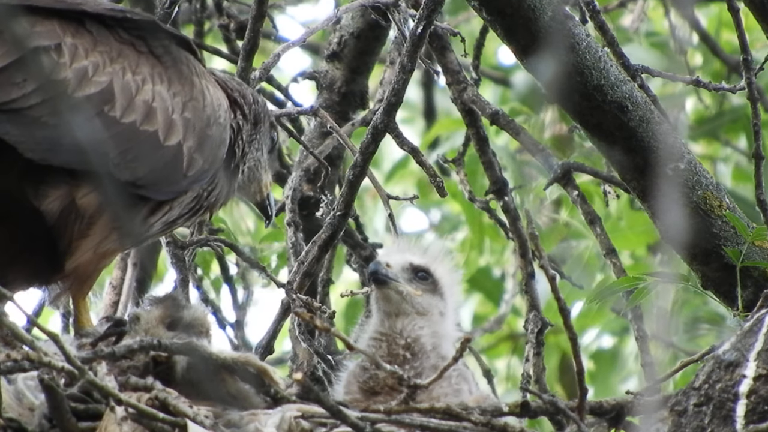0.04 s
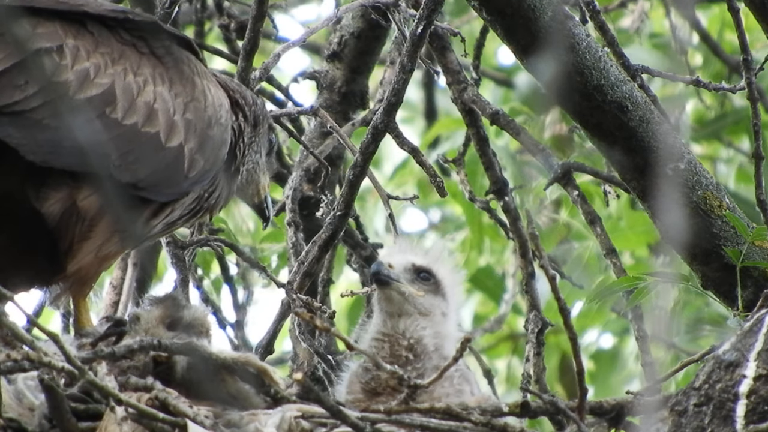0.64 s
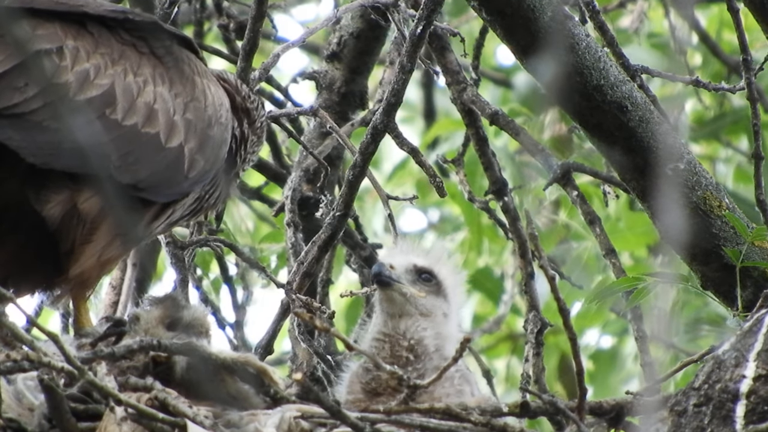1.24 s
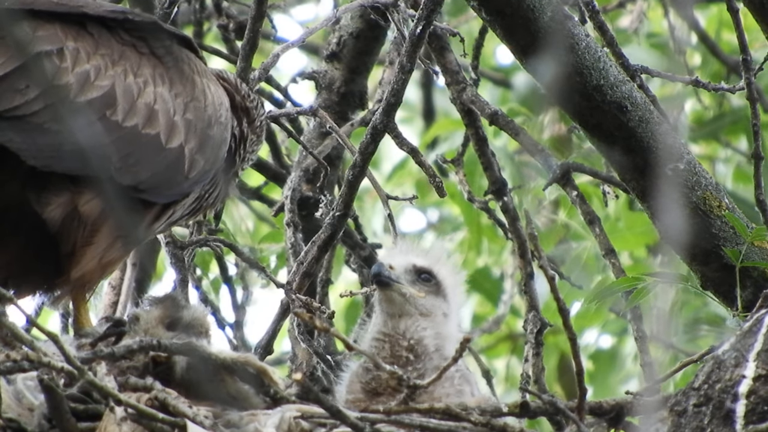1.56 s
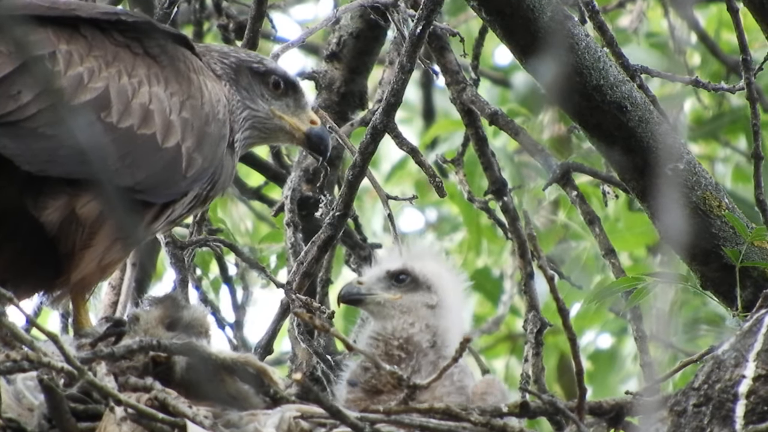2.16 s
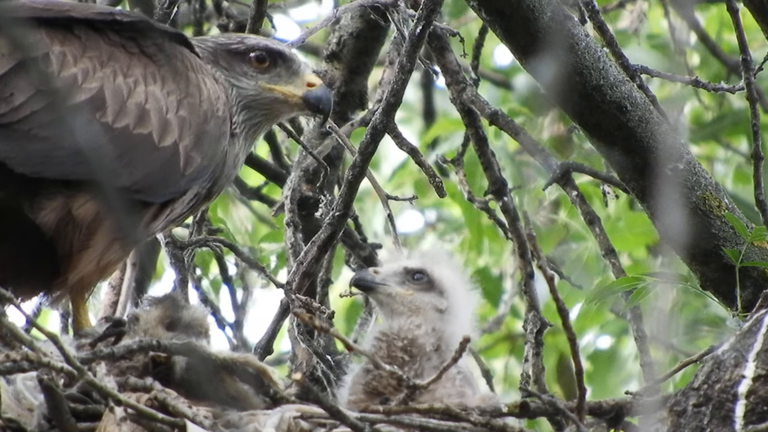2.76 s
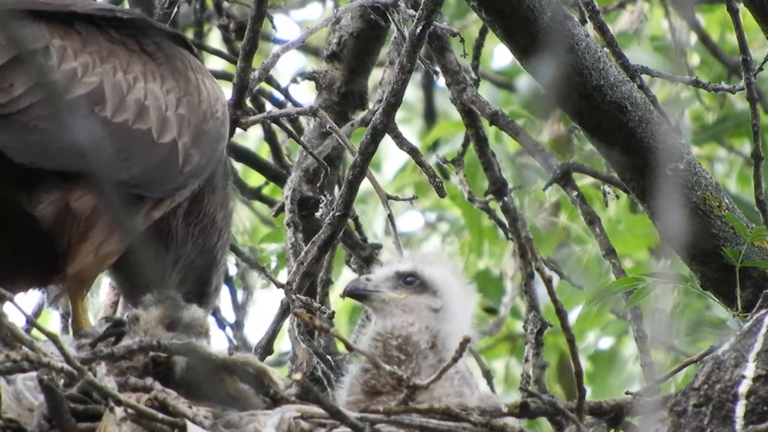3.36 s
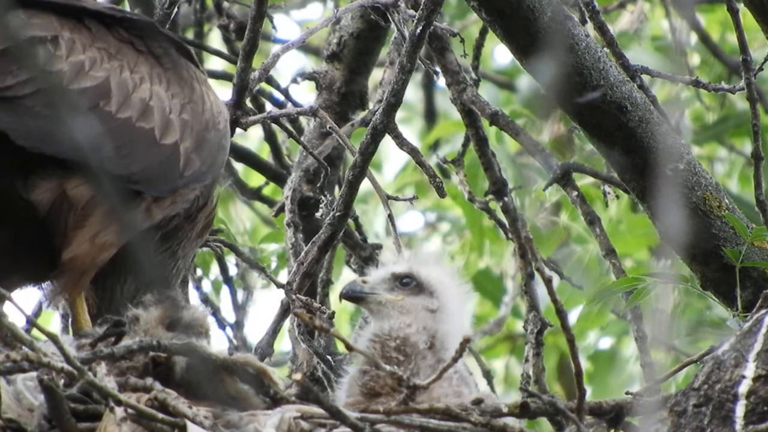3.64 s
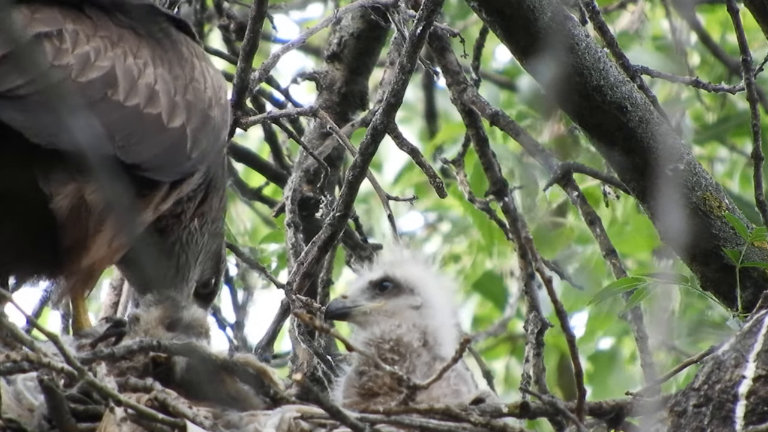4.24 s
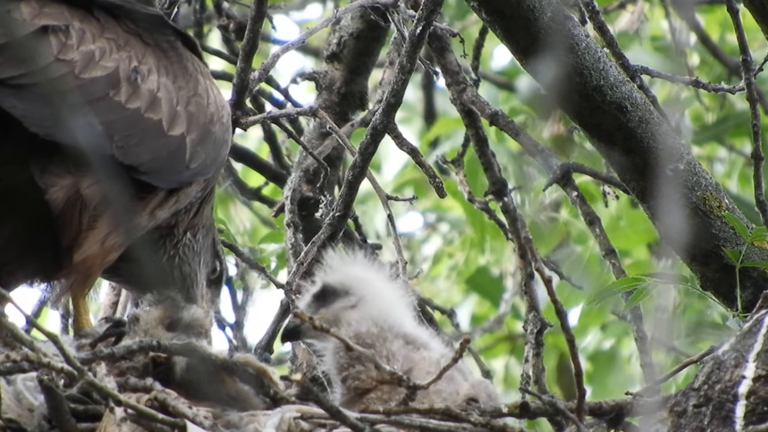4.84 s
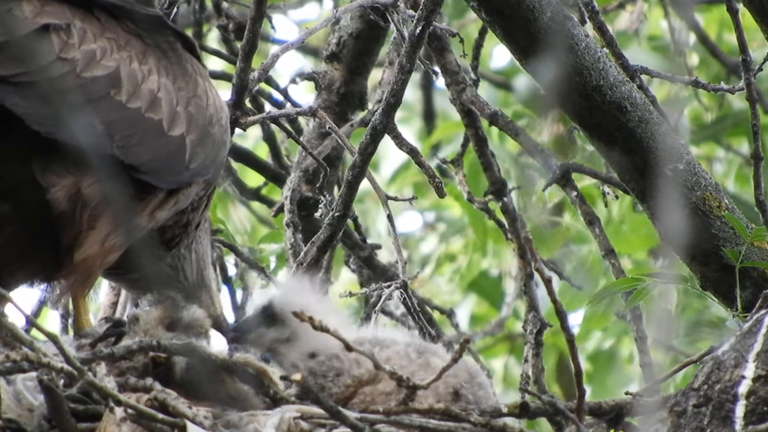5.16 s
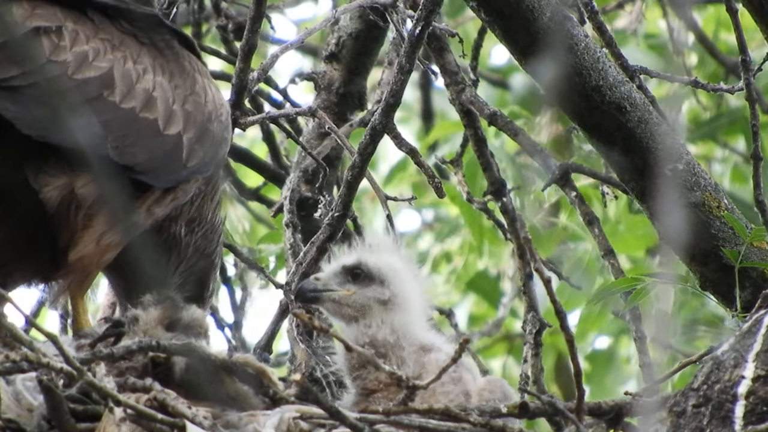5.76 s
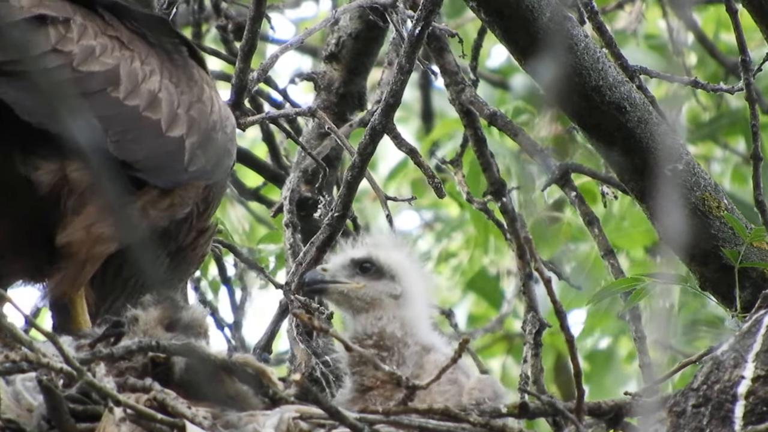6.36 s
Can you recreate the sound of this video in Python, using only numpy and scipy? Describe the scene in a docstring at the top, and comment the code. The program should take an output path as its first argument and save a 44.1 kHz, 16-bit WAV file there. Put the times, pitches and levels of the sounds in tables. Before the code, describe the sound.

A nearby songbird trades sweeping twitters with harsh chirps and short buzzes, over distant birdsong and a faint low outdoor hum.

```python
"""Small birds sing in a leafy tree, over soft outdoor air, a low hum and distant birds. The near bird opens
with a buzz under a thin high call from further off, then trades sweeping twitters with harsh two-voiced chirps
and more buzzes. Around two seconds another bird holds a thin whistle; then one further off repeats a low
scooping note six times. Two last twitters close the scene. Each note is a near-pure tone from a bird's syrinx,
scattered by branches and leaves."""
import sys
import numpy as np
from scipy import signal
from scipy.fft import rfft, irfft
from scipy.io import wavfile
from scipy.ndimage import uniform_filter1d

SR = 44100
rng = np.random.default_rng(int(sys.argv[2]) if len(sys.argv) > 2 else 0)


def generate_wav(sig):
    """Save sig (samples, or channels by samples) to the path in sys.argv[1] as 16-bit PCM at SR."""
    pcm = np.round(np.clip(np.atleast_2d(sig).T, -1, 1) * 32767).astype(np.int16)
    wavfile.write(sys.argv[1], SR, pcm)


N = 282240
TIME = np.arange(N) / SR
FREQS = np.arange(N // 2 + 1) * SR / N
SIDES = np.array([[1], [-1]])  # adds to the left, subtracts from the right


def undb(db):
    """Decibels to gain."""
    return 10 ** (np.asarray(db) / 20)


def unit(x):
    """Scale to rms 1."""
    return x / np.sqrt(np.mean(x ** 2))


def walk(rate_hz, count):
    """Smooth random wander with a spread of 1."""
    step = np.arange(count) * rate_hz / SR
    return 1.226 * np.interp(step, np.arange(4096), rng.standard_normal(4096))


def add(track, start, sound):
    """Mix a sound into the track at a time in seconds."""
    i = int(start * SR)
    sound = sound[max(-i, 0):max(N - i, 0)]
    i = max(i, 0)
    track[i:i + len(sound)] += sound


def noise(points):
    """Noise coloured by an EQ curve of (Hz, dB) points."""
    hz, db = np.transpose(points)
    gain = undb(np.interp(np.log(FREQS + 1), np.log(hz), db))
    return unit(irfft(rfft(rng.standard_normal(N)) * gain, N))


def patchy(x, spread_db, size=2048):
    """Let each narrow band flicker on its own."""
    cells = signal.stft(x, nperseg=size)[2]
    flicker = uniform_filter1d(rng.standard_normal(cells.shape), size=3, axis=-1)
    flicker = unit(uniform_filter1d(flicker, size=2, axis=-2))
    return unit(signal.istft(cells * undb(spread_db * flicker), nperseg=size)[1][..., :N])


def syrinx(hz, db, rough, flutter_db, overtone_db, edge_s=0.00047):
    """A near-pure tone with a weak octave; the membrane trembles in pitch and strength."""
    n = len(hz)
    phase = 2 * np.pi * np.cumsum(hz * (1 + rough * walk(1100, n))) / SR
    i = np.arange(n)
    edges = np.sin(np.pi / 2 * np.clip(np.minimum(i, n - i) / (edge_s * SR), 0, 1)) ** 2
    tone = np.sin(phase) + undb(overtone_db) * np.sin(2 * phase)
    return np.sqrt(2) * tone * edges * undb(db + flutter_db * walk(500, n))


def sweep(points, rough, flutter_db, overtone_db, warble=0):
    """A syllable gliding through (s, Hz, dB) points with rounded turns; returns start and sound."""
    s, hz, db = np.transpose(points)
    s = np.sort(s)
    t = np.arange(s[0] - .002, s[-1] + .002, 1 / SR)
    pitch, loudness = (uniform_filter1d(np.interp(t, s, curve), size=160) for curve in (hz, db))
    pitch = pitch * (1 + warble * walk(261, len(t)))
    return t[0], syrinx(pitch, loudness, rough, flutter_db, overtone_db)


def repeat(shape, cues, **voice):
    """One syllable sung on every cue, each time at its own level and pitch."""
    out = np.zeros(N)
    for at, db, pitch in cues:
        start, sound = sweep(np.array(shape) * [1, pitch, 1], **voice)
        add(out, at + start, undb(db) * sound)
    return out


def phrase(contours, **voice):
    """Notes sung once, each with its own contour."""
    out = np.zeros(N)
    for points in contours:
        add(out, *sweep(points, **voice))
    return out


def beak(x, top_hz=9600):
    """Throat and beak damp the highest overtones."""
    return signal.sosfilt(signal.butter(6, top_hz, fs=SR, output="sos"), x)


def canopy(x, direct_db, branch_db, leaf_db, t60, branch_s=0.019, width=0.55):
    """Branches return a few sharp early echoes; leaves and trunks add a diffuse tail."""
    t = TIME[:SR]
    grain = rng.standard_normal((4, SR))
    sparse = rng.random(SR) < 500 / SR
    early = (grain[0] + width * SIDES * grain[1]) * sparse * np.exp(-t / branch_s) * (t > .002)
    tail = (grain[2] + width * SIDES * grain[3]) * undb(-60 * t / t60) * (1 - np.exp(-t / 0.0075))
    response = (undb(branch_db) * unit(early) + undb(leaf_db) * unit(tail)) / np.sqrt(SR)
    response[:, 0] += undb(direct_db)
    return signal.fftconvolve(x[None], response, axes=1)[:, :N]


# Slapback off the nearest trunks. Each row: delay in seconds, level in dB.
TRUNK_ECHOES = [(.0075, -16), (0.0147, -16.5), (0.026, -22.5), (0.042, -13.5)]
def trunks(x):
    """Each near trunk throws back one clear copy, so that sweeps overlap themselves."""
    out = x.copy()
    for delay, db in TRUNK_ECHOES:
        add(out, delay, undb(db) * x)
    return out


# The bed: two EQ curves and the hum's tones. Each row: frequency in Hz, relative level in dB.
AIR_EQ = [(150, 6), (250, -1), (400, -1.5), (1100, -6.5), (2200, -11), (2700, -9), (3300, -4.5),
          (5200, -13), (7300, -7.5), (9000, -17), (12000, -30.5)]
RUMBLE_EQ = [(15, -17), (30, -15), (38, -3.5), (50, 1.5), (86, -1), (115, -5), (190, -5), (250, -19.5),
             (390, -33), (660, -110)]
HUM_TONES = [(92.5, -47), (140.3, -46.5), (187.6, -54)]
def outdoor_bed(air_db=-51, air_width=0.62, rumble_db=-43, rumble_width=0.12, hum_db=-2, left_db=-0.4):
    """Soft air, wide and gently swelling, over a centred rumble and a wavering hum."""
    air = patchy(noise(AIR_EQ), spread_db=4) + air_width * SIDES * noise(AIR_EQ)
    air = air * undb(air_db + 1.4 * walk(4.255, N))
    rumble = (noise(RUMBLE_EQ) + rumble_width * SIDES * noise(RUMBLE_EQ)) * undb(rumble_db)
    hum = 0
    for hz, db in HUM_TONES:
        phase = 2 * np.pi * np.cumsum(hz + 1.472 * walk(8, N)) / SR
        hum = hum + np.sin(phase) * undb(db + hum_db + 3.4 * walk(8.9, N))
    return (air + rumble + hum) * undb(left_db * SIDES)


# Colour of the far rush. Each row: frequency in Hz, relative level in dB.
RUSH_EQ = [(350, -45), (700, 2), (950, 4.5), (1300, 2), (1900, -40)]
# Its swells. Each row: crest time in seconds, level in dB.
RUSH_SWELLS = [(0, -63), (3.35, -55), (5.8, -59)]
def far_rush(width=0.15, fade_db_per_s=10.5):
    """A soft, patchy midrange rush from far off."""
    swell = sum(undb(db - fade_db_per_s * np.abs(TIME - at)) for at, db in RUSH_SWELLS)
    mid, side = (patchy(noise(RUSH_EQ), spread_db=6) for _ in range(2))
    return (mid + width * SIDES * side) * swell


def distant_birds(level_db=-55.5, count=90):
    """Many birds far off, twittering the near bird's syllables at other pitches."""
    out = np.zeros(N)
    shapes = CHIP, PEAL, ARCH, RISE, FALL
    for when, which, pitch, softness in rng.random((count, 4)):
        points = np.array(shapes[int(which * len(shapes))]) * [1, .65 + .75 * pitch, 1]
        _, sound = sweep(points, rough=.015, flutter_db=2.5, overtone_db=-40)
        add(out, when * N / SR, unit(sound) * undb(-8 * softness))
    return undb(level_db) * unit(out)


# One held whistle and a list of two faint ones. Each row: time in seconds, pitch in Hz, level in dB.
LONG_WHISTLE = [(1.87, 3060, -47), (1.962, 3100, -51), (2.0, 3122, -39.5), (2.028, 3144, -47),
                (2.072, 3094, -33.5), (2.118, 3059, -36), (2.23, 3040, -55)]
BRIEF_WHISTLES = [
    [(1.46, 3130, -54), (1.484, 3123, -50), (1.57, 3150, -59)],
    [(6.18, 3120, -59), (6.194, 2960, -51), (6.225, 3140, -50)],
]
def whistling_bird():
    """Thin, clean whistles that barely move in pitch."""
    return phrase([LONG_WHISTLE, *BRIEF_WHISTLES], rough=0.0047, flutter_db=0.5, overtone_db=-38)


# The scooping note. Each row: seconds from the accent, pitch in Hz, relative level in dB.
SCOOP = [(-.046, 1764, -23), (-.034, 1434, -16.5), (-.022, 1334, -25), (-.003, 2018, -11),
         (.001, 2240, -2.5), (.013, 2400, 2.5), (.02, 2473, -9.5), (.032, 2656, -20)]
# Its cues. Each row: accent time in seconds, level in dB, pitch factor.
SCOOP_CUES = [(2.322, -34, 0.99), (2.594, -31.5, .955), (2.853, -29, 1.022), (3.109, -29.5, 1.034),
              (3.378, -31.5, 1.01), (3.649, -32.5, 0.99)]
def scooping_bird():
    """A low, smooth note that sags and then swings upward."""
    return repeat(SCOOP, SCOOP_CUES, rough=.004, flutter_db=.5, overtone_db=-38)


# The opening call. Each row: time in seconds, pitch in Hz, level in dB.
HIGH_CALL = [(0, 6840, -48.5), (.15, 7550, -55), (.3, 8060, -58.5), (.38, 7250, -62), (.405, 5700, -39)]
def high_call():
    """A thin, quavering note that climbs, then drops."""
    return phrase([HIGH_CALL], rough=.06, flutter_db=4.5, overtone_db=-40, warble=0.076)


# Buzz cues. Each row: start in seconds, length in seconds, centre pitch in Hz, level in dB.
BUZZ_CUES = [(-.05, 0.1, 4770, -35), (0.629, 0.077, 5160, -40), (1.116, 0.14, 5200, -33.5),
             (2.422, 0.084, 4960, -38), (2.678, 0.091, 4865, -35.5), (2.951, 0.076, 4965, -36),
             (3.225, 0.076, 4880, -33.5), (3.48, 0.11, 4850, -37), (4.247, 0.2, 6700, -55),
             (4.642, 0.25, 5650, -42.5)]
def buzzes(trill_hz=130, depth_hz=650, attack_s=0.015, release_s=0.032):
    """The pitch is shaken up and down so fast that the note rasps."""
    out = np.zeros(N)
    for at, length, hz, db in BUZZ_CUES:
        n = int(length * SR)
        t = TIME[:n]
        shake = np.sin(2 * np.pi * np.cumsum(trill_hz * (1 + 0.146 * walk(79.8, n))) / SR)
        swell = np.clip(np.minimum(t / attack_s, (length - t) / release_s), 0, 1)
        pitch = hz + depth_hz * shake
        tone = syrinx(pitch, db - 2 * shake, rough=0.0464, flutter_db=3.5, overtone_db=-20.5)
        add(out, at, swell * tone)
    return beak(out)


# Colour of the bird's breath. Each row: frequency in Hz, relative level in dB.
BREATH_EQ = [(2000, -53), (3200, 5), (5500, 7.5), (7200, 2), (9100, 1.5), (10200, -8.5), (11400, -11),
             (12500, -70)]
def breath(envelope, spread_db, size):
    """A grainy rasp of turbulent air that follows an envelope."""
    return patchy(noise(BREATH_EQ), spread_db, size) * envelope


# The chirp's two voices. Each row: seconds from the accent, pitch in Hz, relative level in dB.
CHIRP_LOW = [(-.062, 3200, -26), (-.027, 3950, -10), (-.018, 5350, 0), (-.008, 5650, -5), (.003, 4100, -5),
             (.021, 3280, -3), (.037, 3700, -11.5), (.056, 3100, -8), (.08, 2243, -22)]
CHIRP_HIGH = [(-.068, 5665, -18.5), (-.04, 6440, -7.5), (-.024, 7120, -56), (-.008, 5902, -10),
              (.003, 4277, 0.5), (.012, 4450, 5), (.02, 4050, -13.5), (.05, 4400, -29)]
# Its breath envelope. Each row: seconds from the accent, relative level in dB.
BREATH_SWELL = [(-.1, -32), (-.045, -11.5), (0, -16.5), (.04, -20), (.08, -19)]
# Chirp cues. Each row: accent time in seconds, level in dB, pitch factor.
CHIRP_CUES = [(0.711, -27, 1.06), (1.192, -27.5, 1.038), (1.688, -26.5, 1.055), (2.304, -29, 1.008),
              (3.159, -27.5, 1.056), (3.853, -29.5, .99), (4.408, -26.5, 1.067), (5.233, -28.5, 1.054)]
def chirps(stroke_s=0.0252, stroke_db=3):
    """Both sides of the syrinx sound at once, the low one in quick strokes, wrapped in breath."""
    low = repeat(CHIRP_LOW, CHIRP_CUES, rough=0.0361, flutter_db=4.5, overtone_db=-25, warble=0.0404)
    high = repeat(CHIRP_HIGH, CHIRP_CUES, rough=0.0388, flutter_db=4, overtone_db=-22, warble=0.0347)
    # the air pressure pulses in step with the nearest accent
    lags = TIME - np.array(CHIRP_CUES)[:, :1]
    from_accent = lags[np.abs(lags).argmin(axis=0), np.arange(N)]
    strokes = undb(stroke_db * (np.cos(2 * np.pi * (from_accent - .008) / stroke_s) + 0.15))
    s, swell_db = np.transpose(BREATH_SWELL)
    swell = sum(undb(db + np.interp(TIME - at, s, swell_db, left=-np.inf, right=-np.inf))
                for at, db, _ in CHIRP_CUES)
    return beak(low * strokes + high) + breath(swell, spread_db=10, size=256)


# A twitter's three syllables; the chip is cued at the start, the dip and peal at the leap.
# Each row: seconds from the cue, pitch in Hz, relative level in dB.
CHIP = [(-.005, 3933, -18), (.003, 5886, -4), (.009, 6400, -20.5), (.02, 6100, -18), (.029, 5320, -3.5),
        (.038, 4820, -3.5), (.057, 4640, -6.5), (.066, 3653, -12), (.082, 3552, -22)]
DIP = [(-.038, 4680, -7.5), (-.018, 4522, 2), (-.003, 4330, -1)]
PEAL = [(-.002, 4474, 1), (.006, 6250, -5), (.022, 5480, -2.5), (0.077, 5336, -1.5)]
# Twitter cues. Each row: start in seconds, seconds to the leap, then level in dB and pitch factor
# for the chip, the dip and the peal in turn.
TWITTER_CUES = [(.467, .149, -26.5, .975, -31, 1.045, -33, .98),
                (0.988, .115, -26, .99, -29.5, 1.0, -37, .99),
                (1.346, 0.12, -28.5, 0.96, -33, .975, -36, .98),
                (3.57, 0.12, -27.5, 0.97, -28.5, 1.064, -38, 1.01),
                (3.927, .115, -29, 1.0, -32, 1.0, -33.5, 1.015),
                (5.889, 0.11, -29.5, 1.004, -33, 1.026, -35, 1.012),
                (6.222, 0.12, -32.5, 0.95, -35, 0.95, -34, 0.99)]
def twitters(voice):
    """A chip flicks up and falls, a purer dip sags, and a peal leaps up to ring on one pitch."""
    at, leap, chip_db, chip_pitch, dip_db, dip_pitch, peal_db, peal_pitch = np.transpose(TWITTER_CUES)
    chips = repeat(CHIP, zip(at, chip_db, chip_pitch), **voice)
    dips = repeat(DIP, zip(at + leap, dip_db, dip_pitch),
                  rough=0.01, flutter_db=1, overtone_db=-37, warble=0.0079)
    peals = repeat(PEAL, zip(at + leap, peal_db, peal_pitch),
                   rough=0.0061, flutter_db=2.2, overtone_db=-42, warble=0.0086)
    return chips + dips + peals


# A flourish's three syllables. Each row: seconds from its own cue, pitch in Hz, relative level in dB.
ARCH = [(-.012, 4340, -13), (.001, 5286, -4), (.022, 5170, -6), (.037, 4400, -3), (.072, 3860, -11)]
RISE = [(-.018, 3914, -9), (0, 5100, -3.5), (.024, 5500, -11), (.054, 5600, -7)]
FALL = [(-.05, 6750, -26), (-.026, 7020, -21), (0, 6630, -6), (.02, 5500, -5), (.041, 4740, -7)]
# Cues for whole flourishes and for the fall alone. Each row: time in seconds, level in dB, pitch factor.
FLOURISH_CUES = [(1.8, -30.5, .995), (4.715, -31.5, 1.005)]
LONE_FALL_CUES = [(0.736, -32, 1.0)]
def flourishes(voice, rise_after_s=.141, fall_after_s=.252):
    """An arch, a rise and a long fall in quick succession; once the fall is sung alone."""
    whole = sum(repeat(shape, np.array(FLOURISH_CUES) + [after, 0, 0], **voice)
                for shape, after in ((ARCH, 0), (RISE, rise_after_s), (FALL, fall_after_s)))
    return whole + repeat(FALL, LONE_FALL_CUES, **voice)


# One slide to the bottom of the voice. Each row: time in seconds, pitch in Hz, level in dB.
SLIDE = [(0.882, 4364, -50), (0.892, 5700, -41.5), (0.905, 4570, -31), (0.928, 4490, -34.5),
         (0.955, 2733, -35), (0.992, 2685, -72)]
def song(breath_db=-14.5):
    """The near bird's clear syllables, with a little breath riding on their strength."""
    voice = dict(rough=0.0235, flutter_db=4, overtone_db=-42, warble=0.0137)
    notes = beak(twitters(voice) + flourishes(voice) + phrase([SLIDE], **voice))
    strength = uniform_filter1d(np.abs(notes), size=600)
    return notes + undb(breath_db) * breath(strength, spread_db=9.5, size=512)


def scene():
    """Each singer reaches the microphone through its own stretch of foliage."""
    chorus = canopy(distant_birds(), direct_db=-2.5, branch_db=-2.5, leaf_db=-3, t60=0.65)
    whistles = canopy(whistling_bird(), direct_db=0, branch_db=1.5, leaf_db=-4.5, t60=0.69)
    scoops = canopy(scooping_bird(), direct_db=-3, branch_db=-5, leaf_db=-5, t60=0.87)
    harsh_calls = chirps() + buzzes() + high_call()
    harsh = canopy(trunks(harsh_calls), direct_db=-3.5, branch_db=-3, leaf_db=-5, t60=0.88)
    clear = canopy(trunks(song()), direct_db=-0.06, branch_db=-1.5, leaf_db=-3, t60=0.94)
    return outdoor_bed() + far_rush() + chorus + whistles + scoops + harsh + clear


def record(dry, port_hz=8800, port_width_hz=900, port_db=5.5, turn_rad=2.1, turn_width_hz=1900,
           right_db=.5, hiss_db=-61, top_hz=15400):
    """The left microphone port rings and turns phase in the treble; both sides hiss; the top is cut."""
    resonance = undb(port_db * np.exp(-((FREQS - port_hz) / port_width_hz) ** 2))
    phase_turn = np.exp(-1j * turn_rad * np.exp(-((FREQS - port_hz) / turn_width_hz) ** 2))
    left = irfft(rfft(dry[0]) * resonance * phase_turn, N)
    right = dry[1] * undb(right_db)
    hiss = undb(hiss_db) * rng.standard_normal((2, N))
    high_cut = signal.ellip(10, .2, 70, top_hz, fs=SR, output="sos")
    return signal.sosfilt(high_cut, np.array([left, right]) + hiss)


dry = scene()
out = record(dry)
generate_wav(out)
```